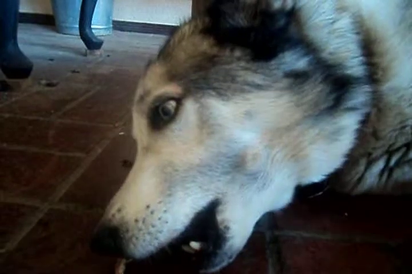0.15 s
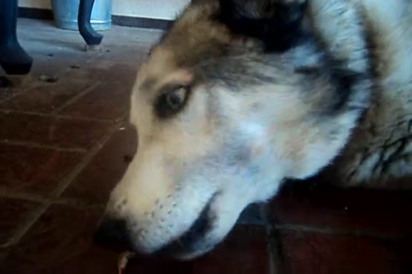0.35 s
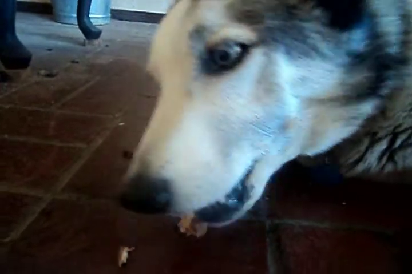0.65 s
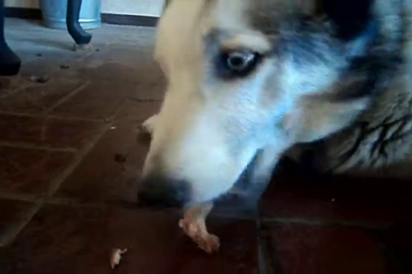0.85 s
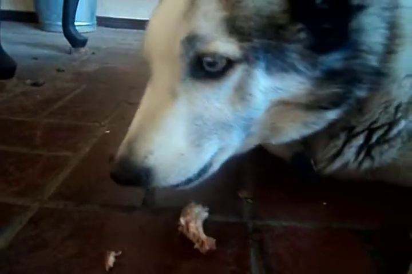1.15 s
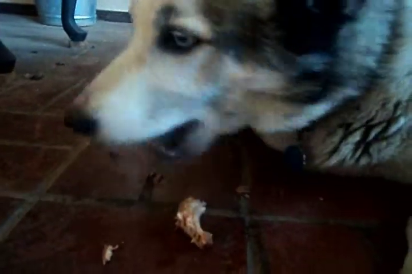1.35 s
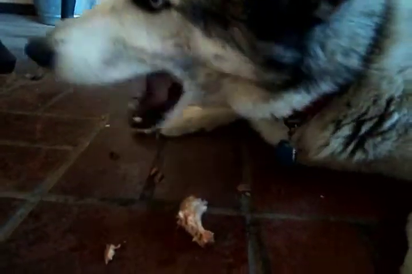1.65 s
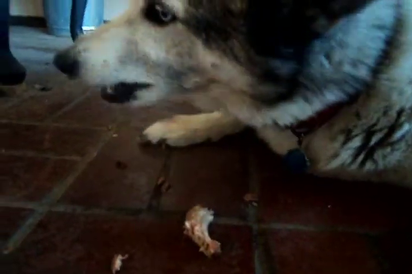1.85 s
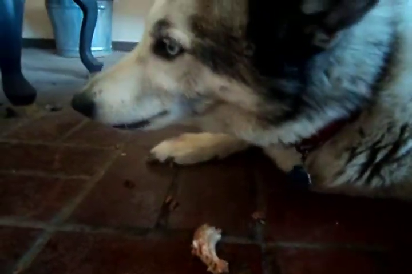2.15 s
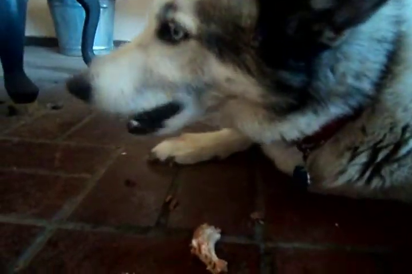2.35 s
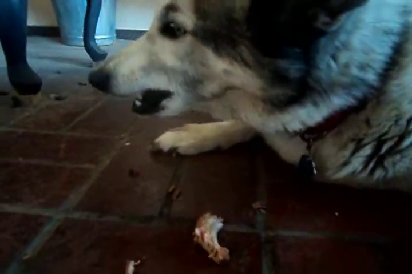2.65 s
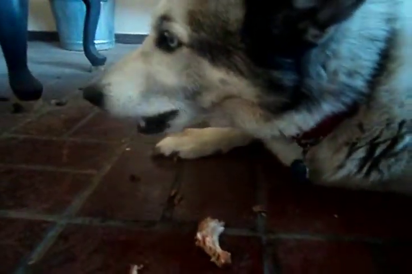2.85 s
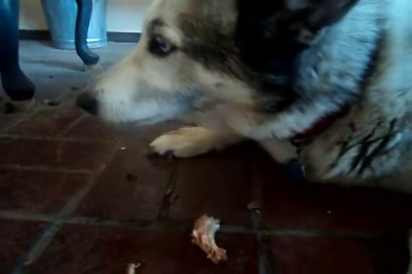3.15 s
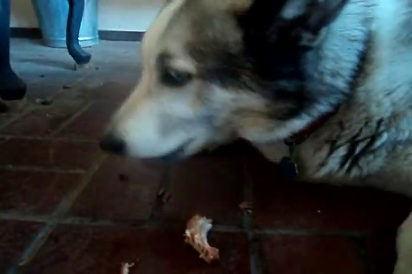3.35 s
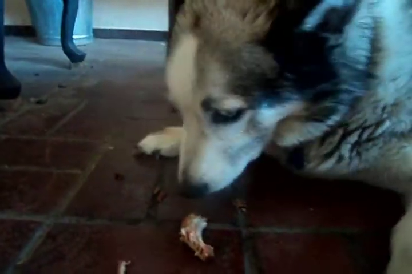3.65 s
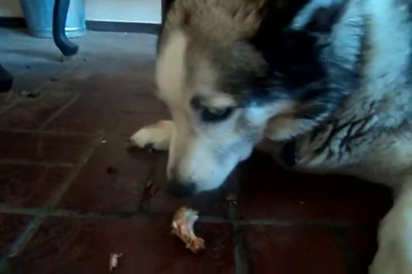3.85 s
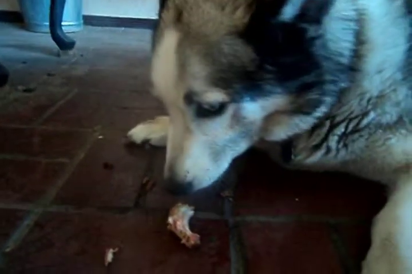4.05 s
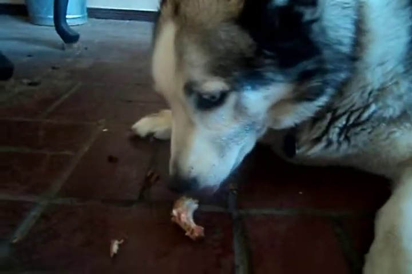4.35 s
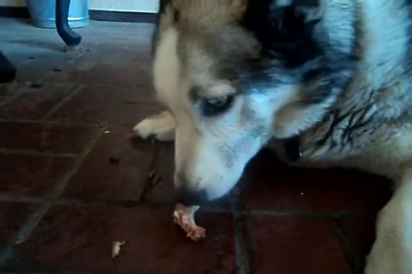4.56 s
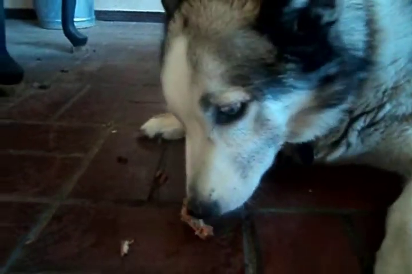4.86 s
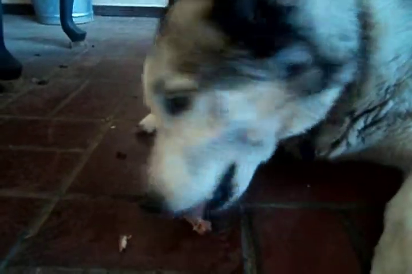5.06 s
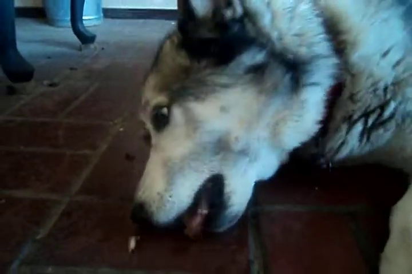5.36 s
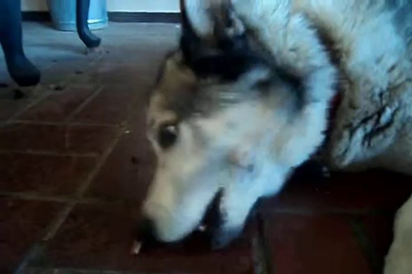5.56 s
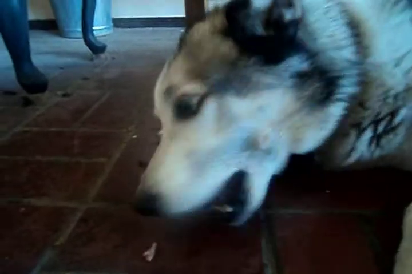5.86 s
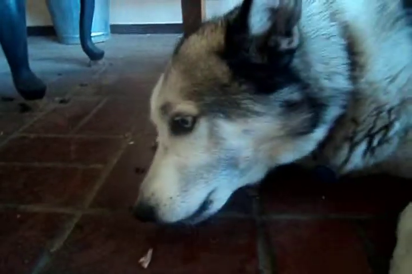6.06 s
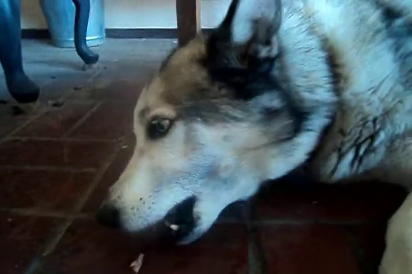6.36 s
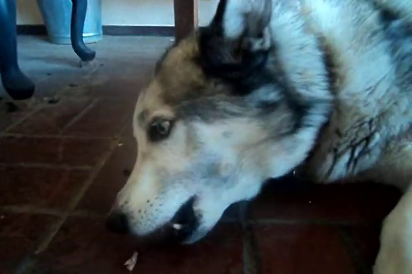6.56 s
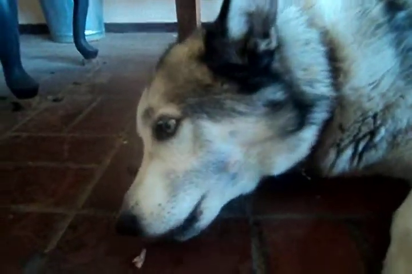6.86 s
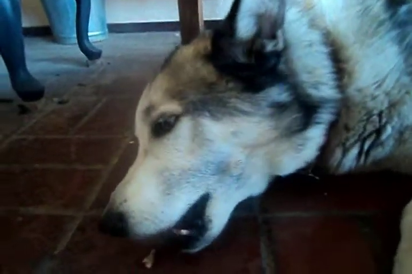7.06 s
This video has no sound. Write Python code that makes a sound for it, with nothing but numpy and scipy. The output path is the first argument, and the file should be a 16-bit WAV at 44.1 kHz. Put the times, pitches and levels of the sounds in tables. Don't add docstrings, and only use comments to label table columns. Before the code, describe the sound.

Close bone raps, tooth clicks and moist mouth sounds, five rough barks from a distant dog, then a sharp bone crack, over microphone hiss.

```python
import sys
import numpy as np
from scipy import signal
from scipy.io import wavfile
from scipy.ndimage import uniform_filter1d

SR = 44100
rng = np.random.default_rng(int(sys.argv[2]) if len(sys.argv) > 2 else 0)


def field_ratio(decibels):
    return 10 ** (np.asarray(decibels, dtype=float) / 20)


def output_pcm(signal):
    pcm = np.clip(np.atleast_2d(signal).T, -1, 1) * 32767
    wavfile.write(sys.argv[1], SR, np.round(pcm).astype(np.int16))


N = 317520


def evened(x):
    return x / np.sqrt(np.mean(x ** 2) + 1e-20)


def read(points, hz):
    f, value = np.transpose(points)
    return np.interp(np.log(hz + 1), np.log(f + 1), value)


def add(mix, start_s, sound):
    part = mix[max(round(start_s * SR), 0):][:len(sound)]
    part += sound[:len(part)]


def resonate(x, hz, width_hz):
    turn = np.exp(2j * np.pi * np.cumsum(hz * np.ones(len(x))) / SR)
    r = np.exp(-np.pi * width_hz / SR)
    return 2 * (turn * signal.lfilter([1 - r], [1, -r], x / turn + 1e-18)).real


def ring(hz, t60_s, rise_s):
    t = np.arange(4000) / SR
    return np.sin(2 * np.pi * hz * t) * (1 - np.exp(-t / rise_s)) * field_ratio(-60 * t / max(t60_s, 0.002))


def strike(hz, tick_hz, tick_db, t60_s, tick_t60_s, splinter, crunch):
    grit, crumbs = rng.standard_normal((2, 4000))
    t = np.arange(len(grit)) / SR
    tick = ring(tick_hz, tick_t60_s, 0.0003)
    tick = tick + splinter * grit * field_ratio(-60 * t / (1.3 * tick_t60_s))
    crumbs = evened(resonate(resonate(crumbs, 0.9 * hz, 2.2 * hz), 0.81 * hz, hz))
    crumbs = crumbs * (1 - np.exp(-t / 0.0014)) * field_ratio(-60 * t / (7.0 * max(t60_s, 0.002)))
    return ring(hz, t60_s, 0.00035) + crunch * crumbs + field_ratio(tick_db + 12.0) * tick


# start in seconds, peak in dB, body in Hz, edge level in dB re the body,
# body t60 in seconds.
BONE_KNOCKS = [
    (.0, -40.5, 770, -21, 0.028),
    (.228, -23.5, 1147, -10.5, 0.036),
    (0.2475, -26, 1290, -7.5, 0.053),
    (2.0649, -20, 820, -12, 0.015),
]


def knocks():
    out = np.zeros(N)
    for start_s, db, hz, edge_db, t60_s in BONE_KNOCKS:
        hit = strike(hz, 3320, edge_db, t60_s, tick_t60_s=0.009, splinter=1.0, crunch=0.12)
        add(out, start_s, field_ratio(db) * hit)
    return out


# frequency in Hz, density in dB per Hz.
HISS_SPECTRUM = [(25, -3.5), (75, -2.5), (200, -4), (390, -8), (830, -12), (2000, -17), (3600, -20),
                 (4900, -24.5), (5350, -28), (5560, -39.5), (5800, -29.5), (6500, -37), (7200, -48.5),
                 (7800, -64.5)]


def hiss():
    frames, hz = N // 256 + 5, np.fft.rfftfreq(1024, 1 / SR)
    a, b, patches = rng.standard_normal((frames, 513, 3)).T
    patches = evened(uniform_filter1d(uniform_filter1d(patches, 14, 0), 14, 1))
    z = (a + 1j * b) * field_ratio(read(HISS_SPECTRUM, hz)[:, None] + patches)
    return field_ratio(-53.5) * evened(signal.istft(z, nperseg=1024, noverlap=768)[1][:N])


# start in seconds, peak in dB, mouth cavity in Hz, tooth tick in Hz,
# tick level in dB re the cavity.
TOOTH_TICKS = [(0.178, -45.5, 1130, 2210, 3), (0.44, -45, 1060, 3080, -5), (0.821, -56.5, 877, 2700, 5),
               (0.832, -46, 1220, 3320, -5.5), (0.945, -45, 1070, 3670, -4), (1.011, -44, 727, 3500, -7),
               (1.316, -50.5, 1250, 3530, 1), (5.266, -30, 1100, 3350, -10), (5.541, -50, 750, 3220, -1.5),
               (5.864, -47.5, 850, 3730, -6), (5.925, -35, 1420, 2100, -6.5), (6.158, -55.5, 603, 3420, 0),
               (6.484, -42, 1430, 3400, -6), (6.57, -50.5, 775, 4260, 5.5),
               (6.719, -44.5, 1080, 2460, -7.5), (6.737, -59, 678, 2630, 6)]


def ticks():
    out = np.zeros(N)
    for start_s, db, hz, tick_hz, tick_db in TOOTH_TICKS:
        hit = strike(hz, tick_hz, tick_db, 0.025, tick_t60_s=0.0065, splinter=0.4, crunch=0.16)
        add(out, start_s, field_ratio(db) * hit)
    return out


# start in seconds, peak in dB, frequency in Hz,
# t60 in seconds.
BODY_THUDS = [(0.1788, -28.5, 3900, 0.0086), (.248, -36, 5640, 0.007), (.248, -18, 696, 0.0086),
              (.249, -27, 335, 0.043), (.25, -32, 275, 0.065), (0.31, -51, 1090, 0.036),
              (2.066, -27, 1795, 0.019), (2.485, -36, 534, 0.016), (5.272, -36, 1200, 0.03),
              (5.283, -40, 1150, .02), (5.3618, -30, 6700, .005), (5.3625, -30, 1900, .008),
              (5.3645, -27, 900, 0.0076), (5.368, -36, 600, 0.03), (6.3315, -35.5, 3670, 0.0088),
              (6.34, -40, 1485, 0.044), (6.793, -27.5, 2440, 0.0077), (6.793, -37, 4270, .007),
              (6.793, -21.5, 1770, 0.0063), (6.805, -19.5, 159, 0.0084)]


def thuds():
    out = np.zeros(N)
    for start_s, db, hz, t60_s in BODY_THUDS:
        add(out, start_s, field_ratio(db) * ring(hz, t60_s, 0.00048))
    return out


# start in seconds, peak in dB, mouth cavity in Hz,
# cavity t60 in seconds.
MOUTH_POPS = [(0.623, -45, 1074, 0.048), (0.9, -44.5, 1105, 0.062), (0.937, -46, 1030, 0.032),
              (1.144, -42.5, 670, 0.028), (1.816, -46.5, 940, 0.032), (3.911, -45.5, 670, 0.02),
              (5.049, -42, 870, 0.022), (5.3925, -24, 680, 0.01), (6.106, -40.5, 780, 0.032),
              (6.257, -37, 1060, 0.012), (6.285, -48.5, 900, 0.034), (6.3312, -30, 1140, 0.025),
              (6.793, -23, 920, 0.012), (6.873, -42.5, 720, 0.036), (6.954, -43, 870, 0.03),
              (7.072, -44, 880, 0.017)]


def pops():
    out = np.zeros(N)
    for start_s, db, hz, t60_s in MOUTH_POPS:
        hit = strike(hz, 2900, -21, t60_s, tick_t60_s=0.0065, splinter=0.4, crunch=0.16)
        add(out, start_s, field_ratio(db) * hit)
    return out


def breath(loudest_s, db, swell_s, fade_s):
    t = np.arange(N) / SR - loudest_s
    return field_ratio(db - 23.5 * np.maximum(-t / swell_s, t / fade_s))


# loudest moment in seconds, level in dB, swell in seconds,
# fade in seconds.
NOSE_SNIFFS = [
    (1.549, -56.5, 0.19, 0.55),
    (2.051, -54.5, 0.31, .02),
]
CHEST_HUFFS = [
    (1.975, -48, 0.054, 0.14),
]


def huff():
    air = rng.standard_normal((2, N))
    nose = evened(resonate(air[0], 3800, 2200) + 2.4 * resonate(air[0], 5100, 1500))
    chest = resonate(resonate(air[1], 250, 120), 290, 200)
    chest = evened(chest + 0.35 * resonate(air[1], 690, 400))
    nose = nose * sum(breath(*row) for row in NOSE_SNIFFS)
    return nose + chest * sum(breath(*row) for row in CHEST_HUFFS)


def tract(drive, modes, mouth=0.88):
    out = 0
    for k, (hz, width_hz, db) in enumerate(modes):
        mode = resonate(resonate(drive, hz * mouth, width_hz), hz * mouth, 2.0 * width_hz)
        out = out + np.cos(np.pi * k) * field_ratio(db) * mode
    return out


# frequency in Hz, width in Hz, level in dB.
THROAT_MODES = [(680, 165, -16.5), (1030, 169, 8), (1590, 400, -9)]
# factor on the muzzle resonance, width in Hz, level in dB.
RASP_MODES = [(1, 260, -8), (1.5, 700, -17)]
# frequency in Hz, width in Hz, level in dB.
BEAM_MODES = [(2720, 1350, -15.5), (3870, 1710, -16.5), (4790, 1200, -15), (6650, 1660, -21)]


def bark(call, voice, aim):
    _, swell_s, fade_s, top_db, top_hz = call
    first_hz, rough_top, wide, closing_to = voice
    open_rasp_db, muzzle_hz, upper_db, facing_db, boom_db = aim
    t = np.arange(0, swell_s + fade_s + 0.014, 1 / SR)
    up, down = np.clip(t / swell_s, 0, 1), np.clip((t - swell_s) / fade_s, 0, 1)
    opened = np.clip(up / 0.48, 0, 1)

    effort_db = top_db - 25.5 * (1 - up) ** 1.87 - 11.5 * down ** 1.3
    hz = top_hz * (1 - 0.06 * down) - (top_hz - first_hz) * (1 - up) ** 1.4
    rough = np.clip(0.23 + (rough_top - 0.23) * up + 0.2 * down, 0, 1)
    mouth = wide * (0.71 + (1 - 0.71) * opened) + (closing_to - wide) * down
    rasp_db = open_rasp_db - 12 * (1 - opened)

    jitter, air = rng.standard_normal((2, len(t)))
    turns = np.cumsum(hz * (1 + 0.26 * rough * uniform_filter1d(jitter, 100))) / SR
    folds = evened(sum(np.cos(2 * np.pi * k * turns) for k in range(1, 9)))
    puffs = 2.93 * evened((0.36 + np.exp(-(turns % 1) / 0.48)) * air)

    throat = tract((1 - rough) * folds + rough * puffs, THROAT_MODES, mouth)
    chest = 0.31 * (1 - rough) * np.sin(2 * np.pi * turns)
    blown = 0.43 * (1 - rough) * folds + 0.66 * puffs
    muzzle = muzzle_hz * np.minimum(mouth + 0.062, 1)
    upper = field_ratio(upper_db) * tract(blown, RASP_MODES[1:], muzzle)
    rasp = field_ratio(rasp_db) * (tract(blown, RASP_MODES[:1], muzzle) - upper)
    boom = field_ratio(boom_db) * resonate(resonate(puffs, 323, 240), 323, 240)
    beam = field_ratio(rasp_db + facing_db) * tract(puffs, BEAM_MODES)
    sound = throat + chest + boom - rasp - beam

    closing = np.clip((t[-1] - t) / 0.066, 0, 1)
    level = np.sqrt(uniform_filter1d(sound ** 2, 1500) + 1e-9)
    return field_ratio(effort_db) * sound / level * closing


# frequency in Hz, t60 in seconds.
ROOM_T60 = [(250, 0.8), (660, 0.49), (1740, 0.65), (4590, 0.49), (7000, 0.5)]


def room(x, gap_s):
    taps = np.zeros(SR)
    slots = np.arange(0, SR - 20, 20)
    taps[slots + rng.integers(0, 20, len(slots))] = rng.choice([-1., 1.], len(slots))
    hz, t, z = signal.stft(taps, SR, nperseg=256)
    tail = signal.istft(z * field_ratio(-60 * t / read(ROOM_T60, hz)[:, None]), SR, nperseg=256)[1]
    tail = tail * np.clip(np.arange(len(tail)) / SR / gap_s, 0, 1)
    return signal.fftconvolve(x, tail / np.linalg.norm(tail))[:N]


# start in seconds, swell in seconds, fade in seconds, top effort in dB,
# top pitch in Hz.
BARK_CALLS = [
    (2.128, .052, 0.061, -21, 660),
    (2.575, .055, 0.076, -22.5, 688),
    (2.87, .055, 0.076, -20.5, 690.3),
    (3.09, .075, .05, -19.5, 700.3),
    (3.518, .035, 0.028, -24, 461),
]
# first pitch in Hz, roughness 0-1 at top effort, mouth open and mouth at the end
BARK_VOICES = [(430.3, 0.55, 1.073, 1.11), (320.8, 0.52, 1.0, 0.7), (277.6, 0.64, 0.953, 0.8),
               (299.3, 0.59, 0.945, 0.93), (350.5, .52, .84, 0.94)]
# rasp in dB, muzzle resonance in Hz, upper muzzle mode in dB,
# forward beam in dB, chest boom in dB.
HEAD_AIMS = [(-6.5, 1890, 0, 6, -28), (4, 2230, -9.5, -15, -24.5), (3.5, 2260, -5, -14, -25),
             (5, 2190, -3.5, -12.5, -25.5), (0.5, 1980, -0.5, -23, -15.5)]


def far_dog():
    out = np.zeros(N)
    for call, voice, aim in zip(BARK_CALLS, BARK_VOICES, HEAD_AIMS):
        one = np.zeros(N)
        add(one, call[0], bark(call, voice, aim))
        out = out + field_ratio(-4) * one + field_ratio(-2.5) * room(one, gap_s=0.003)
    return out


# start in seconds, level in dB, pitch in
# Hz, length in seconds, pitch rise as a factor.
SOFT_TONES = [
    (5.723, -55, 613, 0.097, 1.096),
    (6.107, -62, 720, 0.042, 1.15),
    (6.218, -61.5, 930, 0.061, 1.07),
    (6.821, -55, 880, 0.016, 1.1),
    (6.948, -55, 750, 0.053, 1.21),
    (5.879, -61, 880, 0.031, 0.84),
    (2.36, -56.5, 400, .11, .88),
    (3.23, -56.5, 245, 0.079, .95),
]


def squeaks():
    out = np.zeros(N)
    for start_s, db, hz, length_s, rise in SOFT_TONES:
        air = rng.standard_normal(round(length_s * SR))
        pitch_hz = hz * np.linspace(1, rise, len(air))
        tone = evened(resonate(air, pitch_hz, 54)) + 0.45 * evened(resonate(air, 2 * pitch_hz, 200))
        add(out, start_s, field_ratio(db) * tone * signal.windows.tukey(len(air), 0.5))
    return out


def snaps():
    out = np.zeros(N)
    snap_s, crack_hz = 5.3614, 3380
    t = np.arange(-40, 41) / SR
    add(out, snap_s, -field_ratio(-8.5) * np.cos(2 * np.pi * crack_hz * t) * np.exp(-(t / 0.00011) ** 2))
    add(out, snap_s + 0.00114, field_ratio(-21) * ring(690, 0.016, 0.00037))
    return out


def scene():
    bone = knocks() + thuds()
    teeth = ticks() + pops() + squeaks() + snaps()
    near = teeth + bone + room(field_ratio(-32.5) * teeth + field_ratio(-11.5) * bone, gap_s=0.0015)
    return (near + huff() + far_dog())[None]


# frequency in Hz, gain in dB.
MIC_RESPONSE = [(60, -11), (200, 5.5), (3500, 2.5), (4800, -3), (5500, -18), (6300, -11.5), (7300, -17.5),
                (7700, -26), (7900, -70.5), (15000, -67.5), (16000, -96)]


def microphone(x):
    log_gain = np.log(field_ratio(read(MIC_RESPONSE, abs(np.fft.fftfreq(4096, 1 / SR)))))
    taps = np.fft.ifft(np.exp(np.conj(signal.hilbert(log_gain)))).real[:2048]
    return signal.oaconvolve(x, taps)[:N]


def rate_change(x):
    above = signal.butter(8, [7950, 15500], "bandpass", fs=SR, output="sos")
    haze = evened(resonate(rng.standard_normal(N), 9300, 3000))
    carrier = np.cos(2 * np.pi * (SR / 4) * np.arange(N) / SR)
    return x + signal.sosfilt(above, x * (field_ratio(-64) * carrier + field_ratio(-62) * haze))


def roll_off(x):
    return signal.sosfilt(signal.butter(12, 15700, fs=SR, output="sos"), x)


def record(dry):
    heard = rate_change(microphone(dry[0]) + hiss())
    return roll_off(heard[None])


dry = scene()
out = record(dry)
output_pcm(out)
```